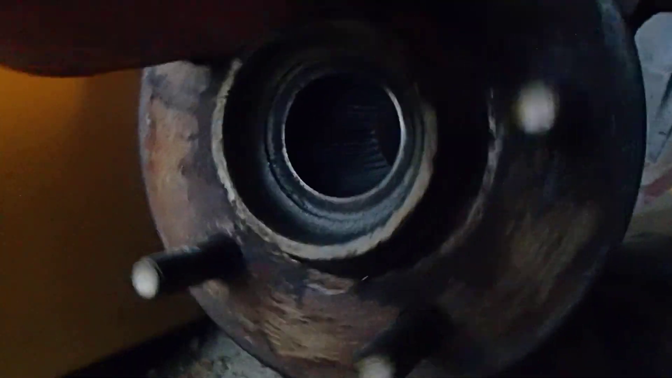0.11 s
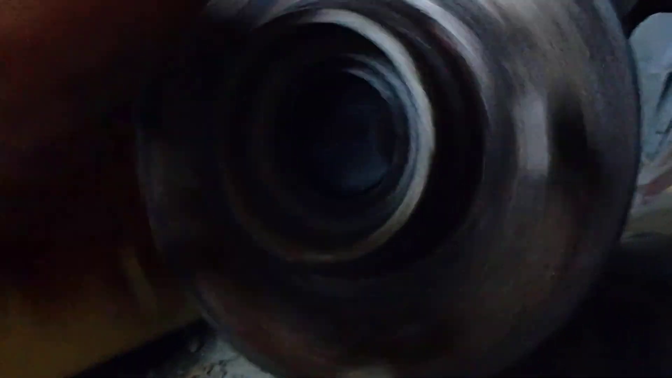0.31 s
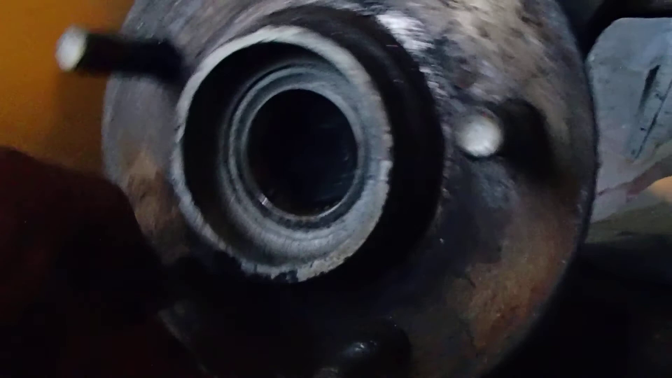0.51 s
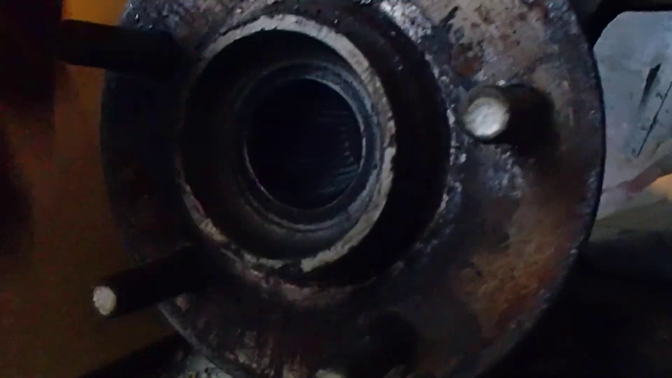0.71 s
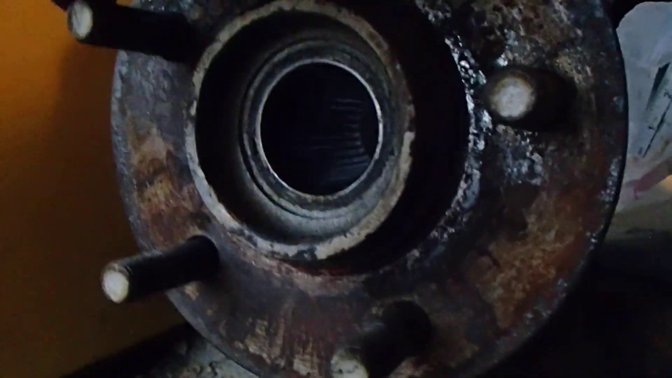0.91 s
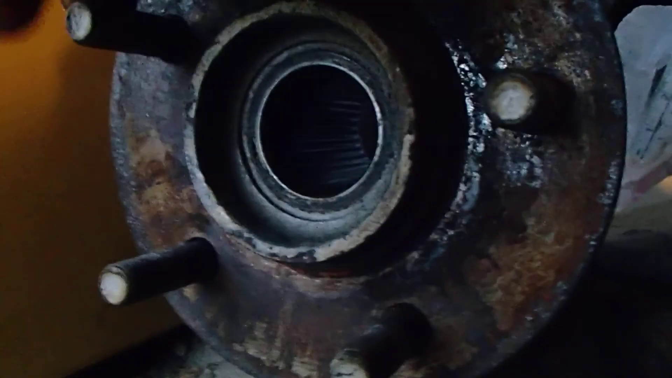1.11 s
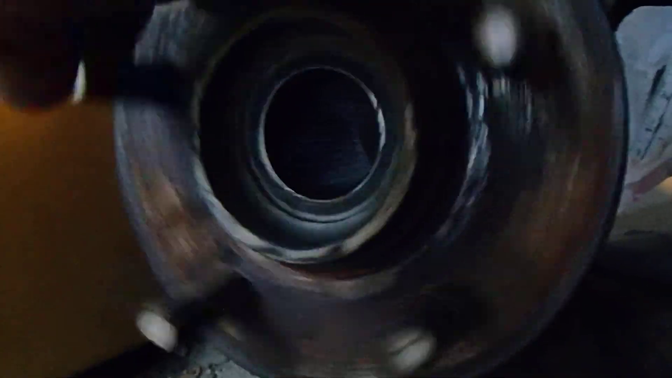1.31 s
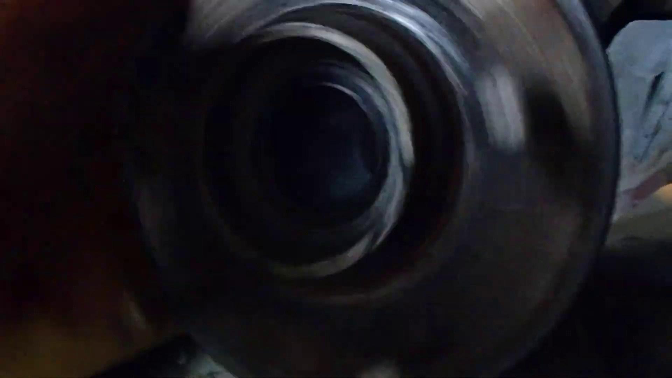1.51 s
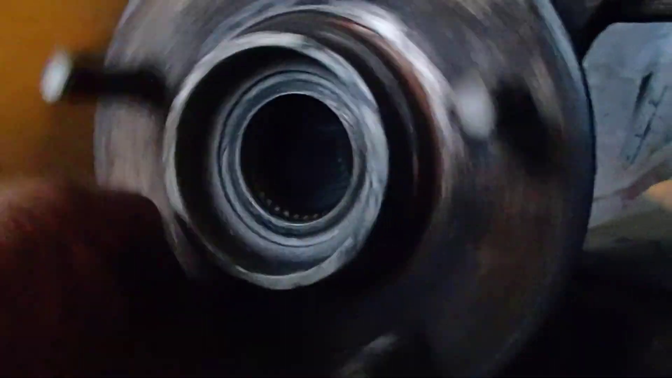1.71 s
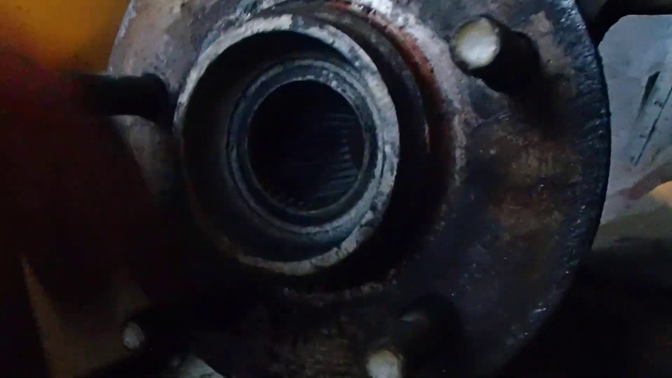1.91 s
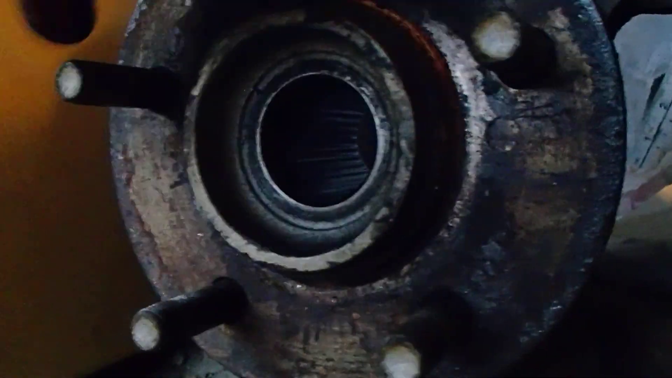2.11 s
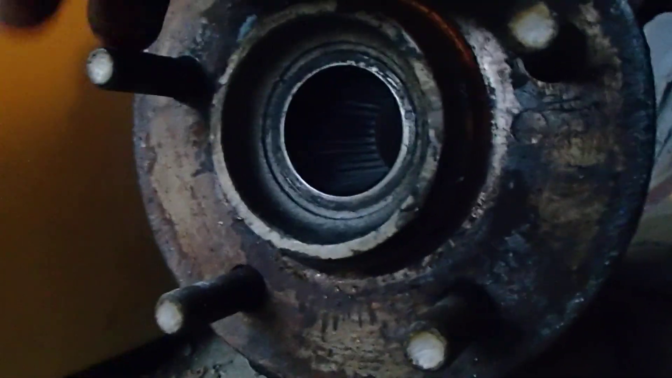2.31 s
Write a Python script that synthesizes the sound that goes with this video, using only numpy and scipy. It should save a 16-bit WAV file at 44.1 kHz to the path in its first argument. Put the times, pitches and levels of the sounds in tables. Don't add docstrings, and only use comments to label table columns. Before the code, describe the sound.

Close and dry, a pitted steel hub clicks and squeaks briefly in two uneven pairs, with dull knocks of play and thin ringing from its flange, over soft machine hum and airy hiss in a workshop.

```python
import sys
import numpy as np
from scipy import signal
from scipy.fft import rfft, irfft, next_fast_len
from scipy.io import wavfile
from scipy.ndimage import uniform_filter1d

SR = 44100
rng = np.random.default_rng(int(sys.argv[2]) if len(sys.argv) > 2 else 0)


def ratio_of_db(decibels):
    return 10 ** (np.asarray(decibels, float) / 20)


def master_out(mix):
    frames = np.transpose(np.atleast_2d(mix))
    ceiling = np.clip(frames, -1, 1)
    pcm = np.round(ceiling * 32767).astype(np.int16)
    wavfile.write(sys.argv[1], SR, pcm)


N = 105840

# f/Hz, width/Hz, level/dB
BEARING_MODES = [(2060, 244, -12.5), (2572, 96, -12.5), (2920, 110, -14), (3580, 190, 2), (5200, 310, -1),
                 (6070, 170, -8), (6796, 260, -10), (3960, 140, -16), (7480, 330, -14), (8340, 43, -32),
                 (9140, 260, -25.5), (10170, 120, -29.5), (10900, 700, -24), (14000, 2900, -22)]


def times():
    return np.arange(N) / SR


def filtered(x, order, hz, kind):
    return signal.sosfilt(signal.butter(order, hz, kind, fs=SR, output="sos"), x)


def ring(clicks, hz, t60):
    r = ratio_of_db(-60 / (t60 * SR))
    w = 2 * np.pi * hz / SR
    return signal.lfilter([0, np.sin(w)], [1, -2 * r * np.cos(w), r * r], clicks + 1e-18)


def burst(start, length, fade):
    t = times() - start
    return (t >= 0) * np.exp(-np.maximum(t - length, 0) / fade)


def slip_train(rows, fall_db):
    jolt = .3
    rows = np.array(rows)
    out = np.zeros(N + SR)
    ms = np.arange(1500) / SR * 1000
    gaps = np.append(np.diff(rows[:, 0]), 1)
    cycles = np.cumsum(np.append(0, gaps[:-1] * rows[:-1, 3]))
    ends = 1000 * gaps + .4 * np.append(rows[1:, 1], 0)
    for (s, rise, db, hz), end, cycle, luck in zip(rows, ends, cycles, rng.random(len(rows))):
        swell = np.sin(np.pi / 2 * np.minimum(ms / rise, 1)) ** 2
        fall = ratio_of_db(db - fall_db * np.maximum(ms - rise, 0) ** 1.5)
        release = np.clip((end - ms) / max(end - rise, .3), 0, 1) ** .35
        swing = np.sin(2 * np.pi * (hz * ms / 1000 + cycle + jolt * (luck - .5)))
        i = int(s * SR)
        out[i:i + len(ms)] += swell * fall * release * swing
    return out[:N]


def race():
    # t/s, rise/ms, peak level/dB, f/Hz
    race_slips = [(0.2222, 2.5, -11, 3530.0), (0.2256, 1.0, -12, 3550.0), (0.2288, 0.6, -22, 3520.0),
                  (0.231, 2.9, -7, 3520.0), (0.378, 2.5, -14, 3650.0), (0.3827, 0.9, -24, 3640.0),
                  (0.3841, 0.7, -18, 3680.0), (0.3857, 1.5, -20, 3660.0), (0.388, 1.9, -19, 3510.0),
                  (0.393, 1.6, -15, 3600.0), (0.3961, 0.9, -23, 3240.0), (0.3977, 0.5, -27, 3310.0),
                  (0.3989, 0.8, -22, 3250.0), (0.4005, 1.8, -13, 3380.0), (0.4049, 1.1, -16, 3310.0),
                  (0.4078, 2.9, -14, 3400.0), (0.4124, 2.0, -18, 3420.0), (0.4152, 0.8, -27, 3320),
                  (1.401, 1.0, -27, 3620.0), (1.4025, 0.7, -26, 3600.0), (1.4039, 1.4, -18, 3610.0),
                  (1.4073, 0.9, -19, 3570.0), (1.4097, 1.3, -20, 3740.0), (1.4119, 2.3, -11, 3530.0),
                  (1.416, 0.9, -16, 3520.0), (1.4188, 1, -25, 3330), (1.5807, 2.5, -14, 3680.0),
                  (1.5839, 1.8, -9, 3520.0), (1.5868, 0.7, -10, 3850.0), (1.5883, 0.7, -15, 3290.0),
                  (1.5899, 0.7, -15, 3420.0), (1.5921, 0.4, -27, 3550.0), (1.5928, 1.3, -11, 3580.0),
                  (1.5959, 2.3, -11, 3350.0), (1.599, 1.0, -12, 3280.0), (1.6007, 0.7, -13, 3240.0),
                  (1.6023, 1.0, -8, 3410.0), (1.6057, 1.2, -15, 3520.0), (1.6078, 0.8, -29, 3320)]
    return slip_train(race_slips, 1.8)


def rollers():
    knock_db, knocked_from_hz, contact_cut_hz = -4, 6600, 12000
    # t/s, rise/ms, peak level/dB, f/Hz
    roller_slips = [(0.2214, 2.5, -18, 6160.0), (0.2244, 0.6, -17, 6170.0), (0.2273, 1.1, -13, 6280.0),
                    (0.2312, 0.6, -16, 6090.0), (0.2325, 0.7, -15, 6140.0), (0.377, 2.5, -27, 6890.0),
                    (0.38, 0.6, -26, 6890.0), (0.3813, 0.6, -27, 6230.0), (0.4023, 2.6, -30, 6690.0),
                    (0.4077, 2.9, -28, 6270.0), (0.4117, 0.9, -31, 6130.0), (1.401, 1.9, -27, 6360.0),
                    (1.4036, 1.0, -27, 6540.0), (1.4053, 1.8, -19, 6210.0), (1.4105, 0.7, -30, 6200.0),
                    (1.4116, 2.7, -18, 6230.0), (1.4156, 0.9, -16, 6190.0), (1.4174, 0.8, -18, 6250.0),
                    (1.58, 2.2, -25, 6540.0), (1.5836, 2.9, -14, 6230.0), (1.5885, 1.2, -26, 6140.0),
                    (1.5903, 1.7, -28, 6530.0), (1.5929, 0.7, -24, 6680.0), (1.5947, 1.6, -26, 6220.0),
                    (1.5985, 1.9, -25, 6260.0), (1.6034, 1.6, -31, 6310.0)]
    knocks = np.zeros(N)
    for (s, rise, db, _), luck in zip(roller_slips, rng.random((len(roller_slips), 6))):
        at = (SR * (s + rise / 1000 * (.3 + luck))).astype(int)
        knocks[at] += ratio_of_db(db + knock_db) * (-1) ** np.arange(6)
    top = np.zeros(N)
    for k, (hz, width, db) in enumerate(BEARING_MODES):
        if hz > knocked_from_hz:
            top += ratio_of_db(db) * ring(knocks, hz, 1.9 / width) * (-1) ** k
    top = filtered(top, 2, [knocked_from_hz, contact_cut_hz], "band")
    return slip_train(roller_slips, 3) + top


def cage():
    # t/s, rise/ms, peak level/dB, f/Hz
    cage_slips = [(0.2214, 1.3, -31, 5090.0), (0.2236, 1.9, -28, 4940.0), (0.2261, 0.9, -20, 5090.0),
                  (0.2305, 1.4, -21, 5280.0), (0.3782, 2.5, -25, 5320.0), (0.3849, 0.8, -34, 4970.0),
                  (0.3887, 1.2, -37, 5100.0), (0.392, 2.5, -30, 5290.0), (0.4034, 2.9, -31, 5460.0),
                  (0.4101, 1.8, -30, 5420.0), (1.4023, 2.5, -28, 5090.0), (1.4057, 1.2, -27, 5110.0),
                  (1.4114, 0.9, -28, 5160.0), (1.4147, 2.2, -24, 5280.0), (1.4187, 0.9, -34, 5480.0),
                  (1.5826, 2.5, -18, 5230.0), (1.5869, 0.9, -20, 5010.0), (1.5891, 0.7, -28, 4900.0),
                  (1.5906, 0.9, -30, 5500.0), (1.5925, 1.1, -23, 5310.0), (1.5981, 1.3, -21, 5290.0),
                  (1.602, 1.6, -27, 5290.0)]
    return slip_train(cage_slips, 2)


def grit():
    contacts_per_s, spread_db, fade_s = 4000, 2.5, .004
    upper_db, upper_from_hz, under_slips_db = 1, 4500, -6.5
    grind_starts = [
        .222,
        .360,
        .3785,
        1.4015,
        1.572,
        1.581,
    ]
    # length/s, level/dB
    grinds = [
        (0.014, -26.5),
        (0.024, -45),
        (0.037, -33.5),
        (0.016, -29),
        (0.008, -41),
        (0.016, -26),
    ]
    slip_modes = [
        3560,
        5240,
        6200,
    ]
    load = sum(ratio_of_db(db) * burst(s, length, fade_s) for s, (length, db) in zip(grind_starts, grinds))
    sizes = ratio_of_db(spread_db * np.minimum(rng.exponential(1, N), 4)) * rng.choice([-1, 1], N)
    clicks = load * sizes * (rng.random(N) < contacts_per_s / SR)
    out = np.zeros(N)
    for k, (hz, width, db) in enumerate(BEARING_MODES):
        near_slips = min(abs(hz - np.array(slip_modes))) < 300
        level = db + upper_db * (hz > upper_from_hz) + under_slips_db * near_slips
        struck = clicks * rng.uniform(.2, 1, N)
        out += ratio_of_db(level) * ring(struck, hz, 2.2 / width) * (-1) ** k
    return filtered(out, 2, 840, "high")


def valley(x):
    share = .55
    gap = [
        4300,
        4800,
    ]
    stopped = filtered(x, 1, gap, "bandstop")
    return filtered(share * stopped + (1 - share) * x, 2, 700, "high")


def swelling_mode(s, hz, db, t60, swell_ms):
    t = np.maximum(times() - s, 0)
    return ratio_of_db(db - 60 * t / t60) * (1 - np.exp(-1000 * t / swell_ms)) * np.sin(2 * np.pi * hz * t)


def caught_flange():
    # t/s, f/Hz, level/dB, t60/s, swell/ms
    catch_rings = [(.236, 3310, -34.5, 0.23, 2), (.416, 3312, -23, 0.085, 1.4), (.413, 6620, -42, .08, 2),
                   (1.418, 3310, -21, 0.21, 3), (1.416, 6620, -37.5, 0.14, 2.75),
                   (1.416, 11000, -50, 0.098, 3), (1.609, 3310, -26, 0.1, 2), (1.608, 3620, -35, 0.07, 2),
                   (1.572, 3400, -32, .08, 1.2), (1.583, 7380, -25, .04, 1.5), (1.412, 2030, -34, .06, 2),
                   (.224, 6720, -26, .05, 2), (1.586, 10140, -42, 0.1, 2)]
    return sum(swelling_mode(*row) for row in catch_rings)


def free_flange():
    touch_db = 5
    # t/s, f/Hz, level/dB, t60/s, swell/ms
    free_rings = [(.624, 3322, -39, .4, 3), (.624, 3309, -51, .4, 3), (.622, 4157, -34, .45, 4),
                  (.622, 4169, -36, .22, 4), (.624, 4737, -50, .15, 2), (.630, 5545, -50, .15, 8),
                  (.624, 6613, -57, .5, 3), (.624, 11090, -64, .1, 2), (1.775, 3319, -51, .6, 15),
                  (1.846, 3315, -53, .9, 3), (1.838, 4172, -51, 1.0, 9), (1.838, 4161, -41, .19, 12),
                  (1.66, 3315, -55, .4, 9), (1.722, 3315, -54, .3, 9), (1.61, 4165, -60, 1.2, 9),
                  (1.69, 5545, -66, 1.5, 9), (1.872, 5545, -48, .25, 8), (1.848, 6568, -56, .2, 4),
                  (1.848, 8242, -62, .2, 4), (1.848, 11090, -61, .16, 4), (2.135, 5545, -58, .9, 25)]
    return sum(swelling_mode(s, hz, db + touch_db, t60, swell) for s, hz, db, t60, swell in free_rings)


def thuds():
    # t/s, f/Hz, level/dB
    play_thuds = [
        (.273, 800, -36),
        (.274, 1150, -41),
        (.287, 850, -40),
        (.307, 1050, -39),
        (.378, 1000, -40),
        (1.501, 800, -39),
        (1.518, 1150, -40),
        (1.538, 750, -41),
        (1.583, 920, -37),
    ]
    return sum(swelling_mode(s, hz, db, t60=.071, swell_ms=2.1) for s, hz, db in play_thuds)


def scuffs():
    # t/s, length/s, centre f/Hz, width/Hz, level/dB
    rubs = [(0.25, 0.079, 2100, 900, -48.5), (.2, .22, 984, 694, -48.5), (1.4, 0.14, 160, 120, -67),
            (.362, 0.031, 13400, 4000, -51.5), (0.512, 0.035, 8900, 9000, -58.5),
            (1.39, 0.26, 1030, 798, -48.5), (1.538, 0.0053, 6450, 900, -42.5), (1.54, .005, 4100, 400, -52),
            (1.584, .004, 8800, 4400, -36), (.6232, .003, 6000, 9000, -46), (1.755, 0.007, 5030, 5900, -51),
            (1.765, 0.04, 12500, 6000, -62), (1.842, .027, 14500, 2400, -57),
            (2.224, .012, 14300, 1200, -64)]
    out = np.zeros(N)
    lumps = np.repeat(rng.uniform(.5, 1.5, N // 150 + 1), 150)[:N]
    for s, length, hz, width, db in rubs:
        edges = np.clip([hz - width / 2, hz + width / 2], 30, 20000)
        x = filtered(rng.standard_normal(N) * lumps, 2, edges, "band")
        press = uniform_filter1d(burst(s, .7 * length, .3 * length), size=int(.2 * length * SR))
        out += ratio_of_db(db) * press * x / x.std()
    return out


def shop(x):
    t60_s = .15
    size = next_fast_len(N + SR)
    w = 2 * np.pi * np.fft.rfftfreq(size)
    echo = 0
    for k, lag in enumerate(rng.uniform(.0099, .022, 10) * SR):
        z = ratio_of_db(-60 * lag / SR / t60_s) * np.exp(-1j * w * lag)
        echo = echo + (-1) ** k * z / (1 - z)
    return irfft(echo * rfft(x, size), size)[:N]


def coloured(points, db):
    hz = np.fft.rfftfreq(N, 1 / SR) + 1
    p = np.array(points)
    gain = ratio_of_db(np.interp(np.log(hz), np.log(p[:, 0]), p[:, 1], left=-120, right=-120))
    x = irfft(gain * rfft(rng.standard_normal(N)), N)
    return ratio_of_db(db) * x / x.std()


def room_noise():
    # f/Hz, level per Hz/dB
    machines = [(12, -38), (20, -4.5), (27, -16.5), (166, -8.5), (217, -11.5), (323, -6.5), (447, -10.5),
                (642, -3), (1500, -2.5), (1950, -75), (3300, -120)]
    # f/Hz, level per Hz/dB
    air = [(1100, -31), (1650, -1.5), (2150, -1.5), (4150, -5), (4540, -10.5), (5500, -13), (7120, -20),
           (16400, -24.5)]
    return coloured(machines, -49.5) + coloured(air, -48)


def scene():
    bearing = race() + rollers() + cage() + valley(grit())
    hub = bearing + caught_flange() + free_flange() + thuds() + scuffs()
    return (hub + ratio_of_db(-35) * shop(hub) + room_noise())[None]


def top_cut(x):
    return signal.sosfilt(signal.butter(12, 16450, fs=SR, output="sos"), x)


def record(dry):
    top_hz, offset = 15950, -.0005
    cut = signal.sosfilt(signal.cheby2(8, 25, top_hz, fs=SR, output="sos"), dry)
    return top_cut(cut + offset)


dry = scene()
out = record(dry)
master_out(out)
```